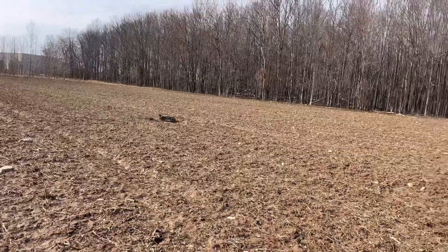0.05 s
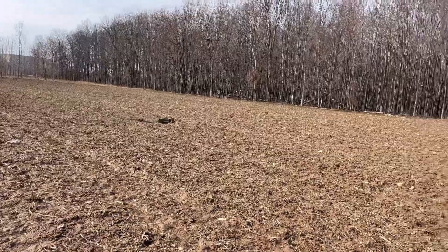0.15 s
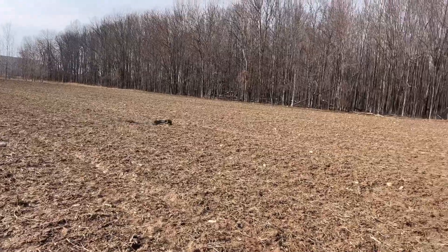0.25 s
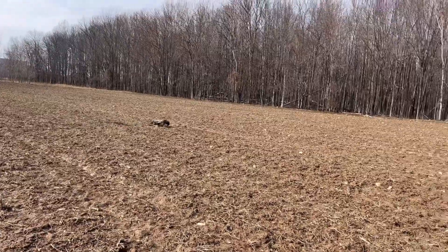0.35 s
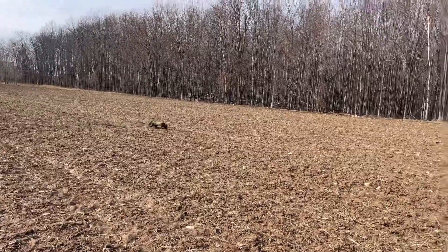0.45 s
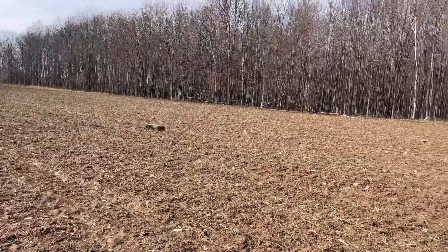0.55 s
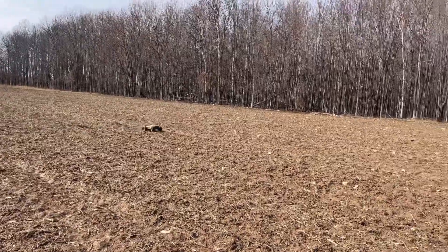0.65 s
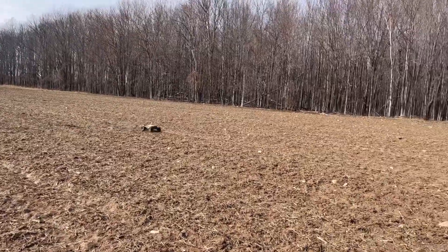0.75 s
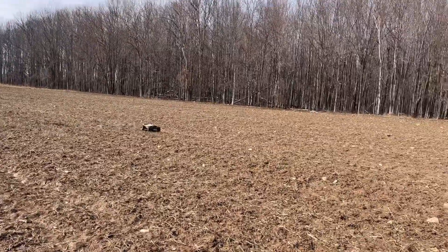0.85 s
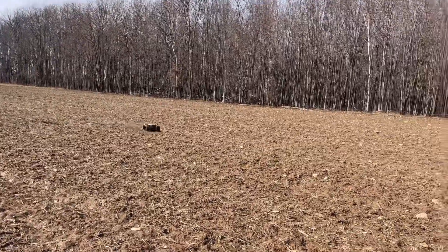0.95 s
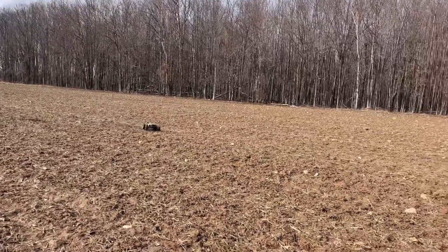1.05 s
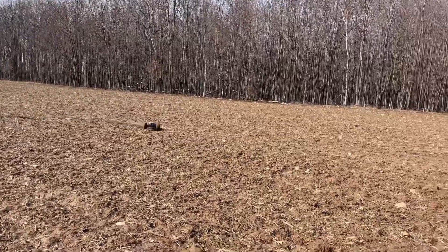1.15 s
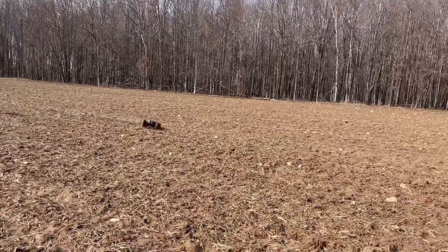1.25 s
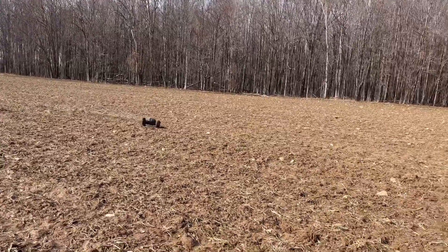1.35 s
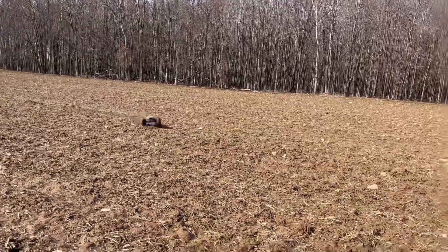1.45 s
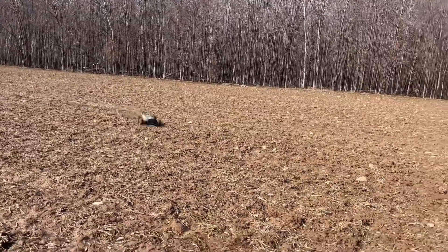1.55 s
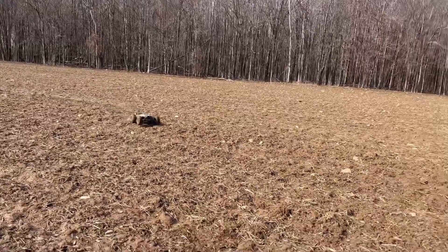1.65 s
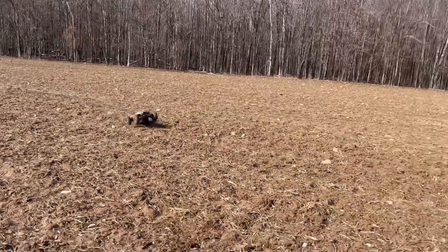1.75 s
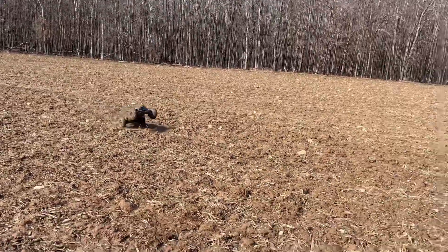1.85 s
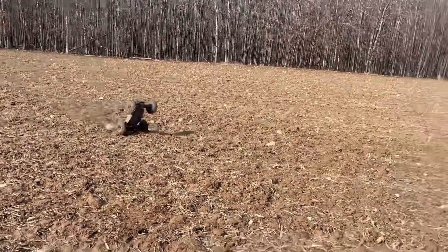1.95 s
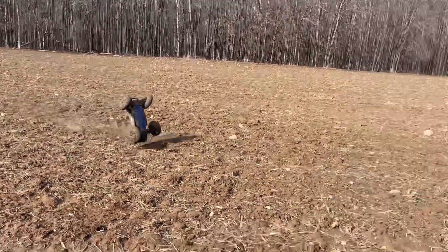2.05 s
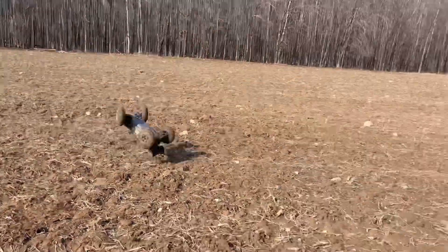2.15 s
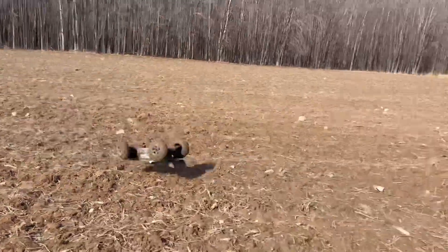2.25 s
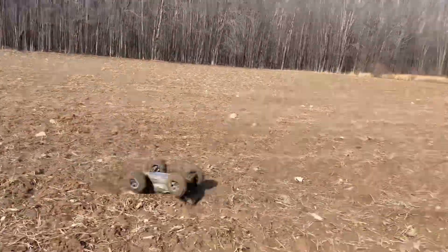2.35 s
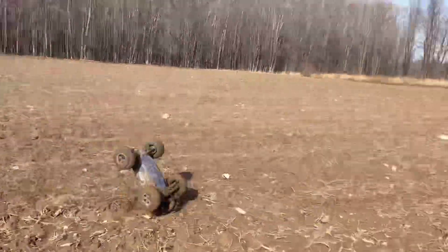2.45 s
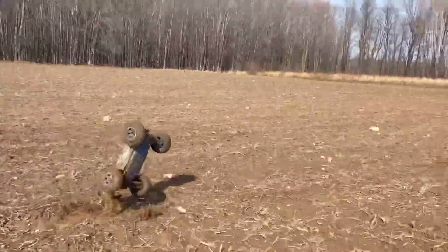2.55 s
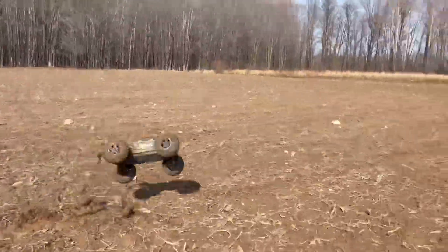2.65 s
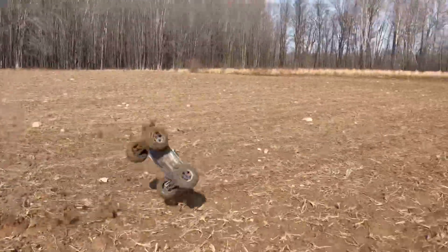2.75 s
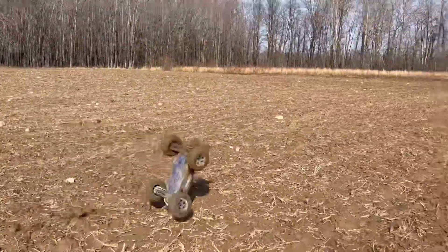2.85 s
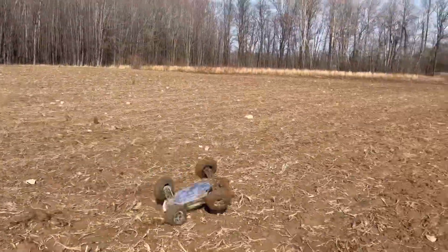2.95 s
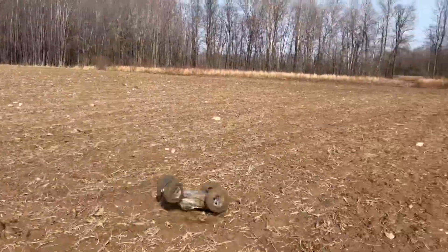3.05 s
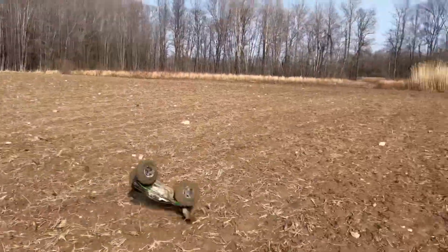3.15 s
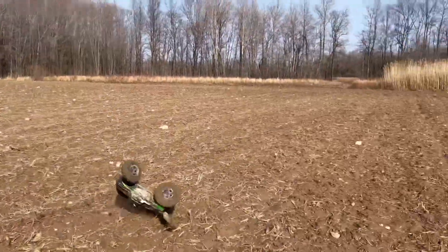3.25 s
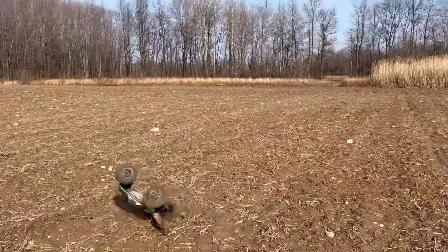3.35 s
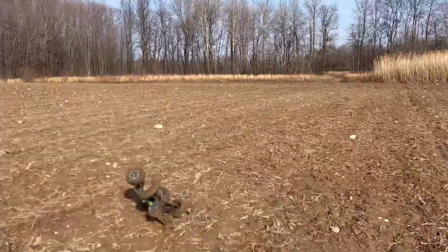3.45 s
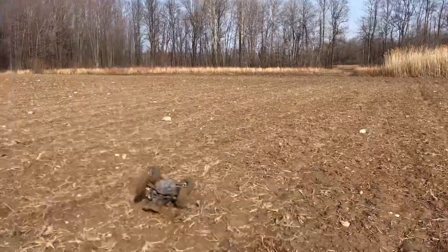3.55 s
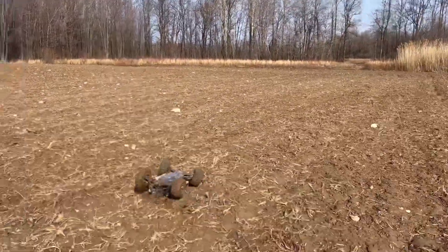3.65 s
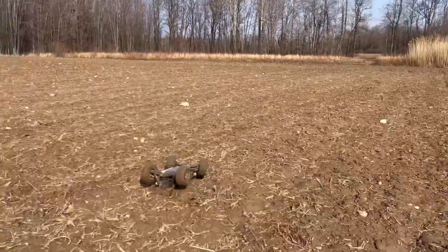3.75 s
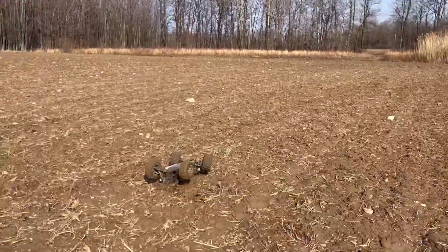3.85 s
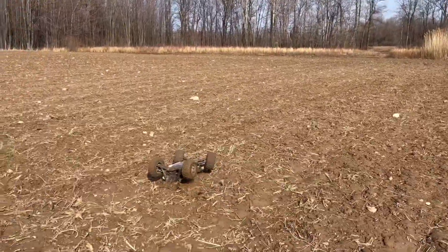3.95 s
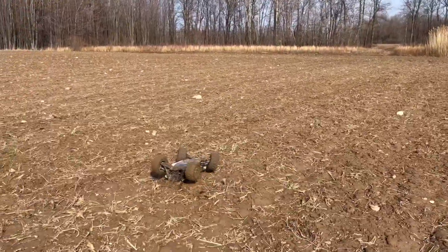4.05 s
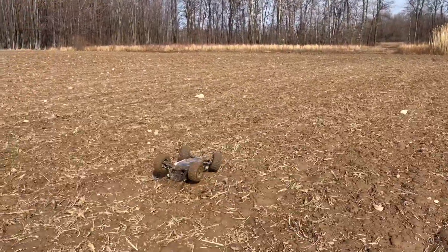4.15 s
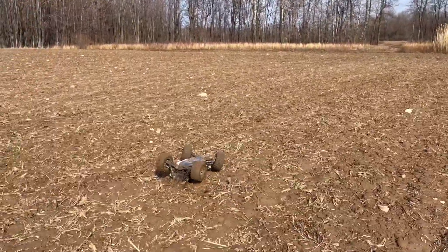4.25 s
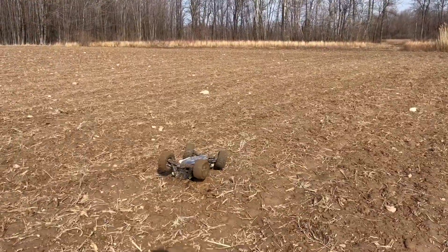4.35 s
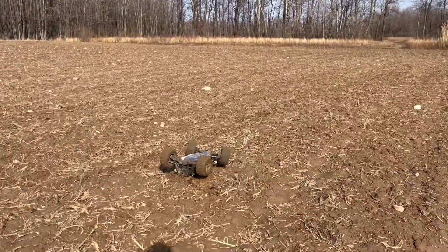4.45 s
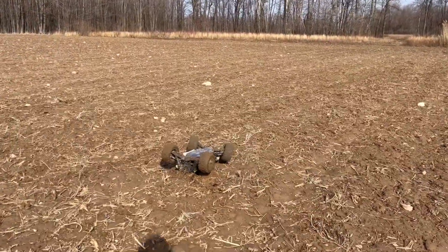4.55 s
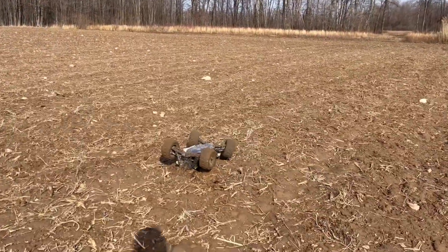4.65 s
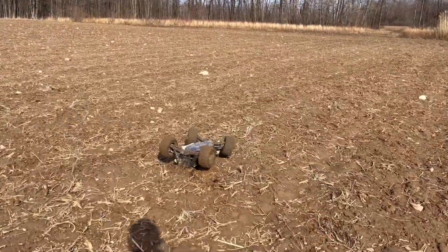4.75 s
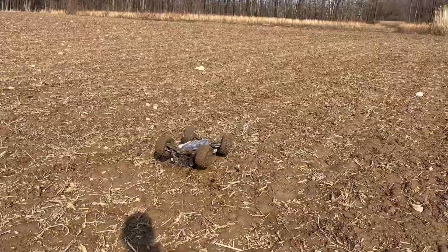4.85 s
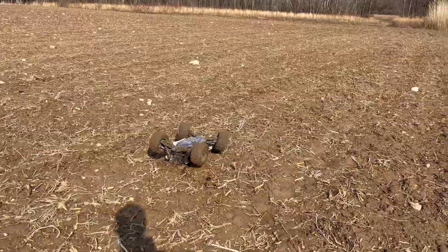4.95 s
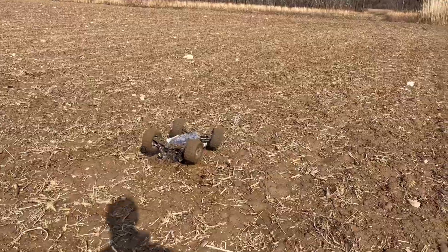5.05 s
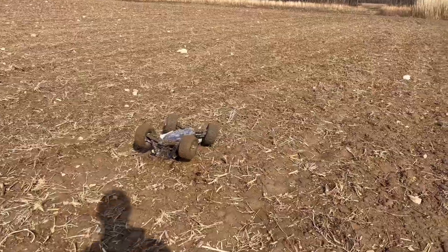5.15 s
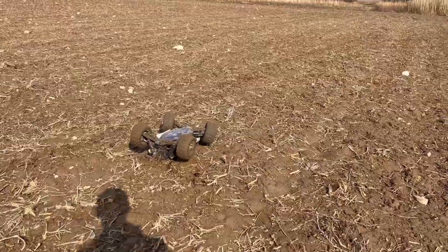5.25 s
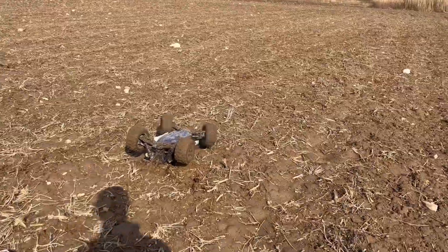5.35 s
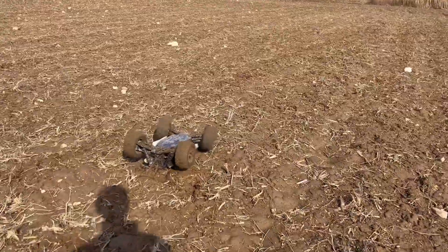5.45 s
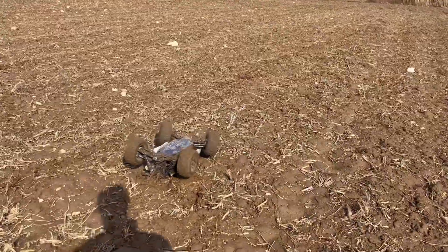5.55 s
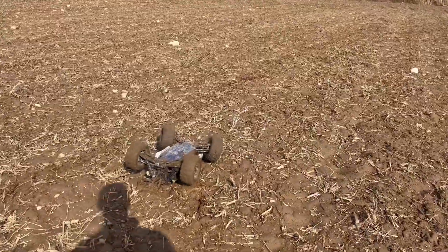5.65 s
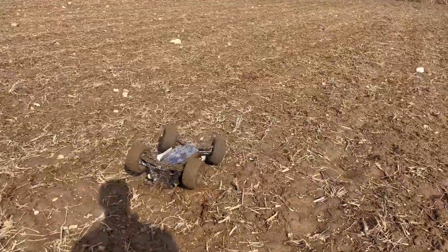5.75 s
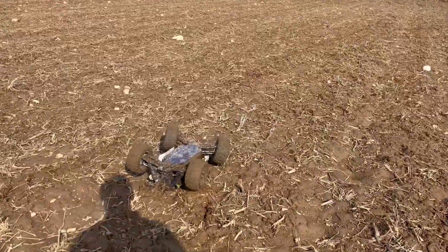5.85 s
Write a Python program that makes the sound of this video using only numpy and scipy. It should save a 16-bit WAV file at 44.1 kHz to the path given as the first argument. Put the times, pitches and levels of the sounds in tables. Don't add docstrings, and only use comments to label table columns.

```python
import sys
import numpy as np
from scipy import signal
from scipy.io import wavfile
from scipy.ndimage import uniform_filter1d

SR = 44100
rng = np.random.default_rng(int(sys.argv[2]) if len(sys.argv) > 2 else 0)


def wav_record(signal):
    frames = np.transpose(np.atleast_2d(signal))
    bounded = np.clip(frames, -1, 1)
    quanta = np.round(bounded * 32767).astype(np.int16)
    wavfile.write(sys.argv[1], SR, quanta)


def attenuation_scalar(level_db):
    decades = np.asarray(level_db, float) / 20
    return 10 ** decades


N = 260190

# t/s, gear mesh f/Hz, whine level/dB
THROTTLE_BURSTS = [
    [(0.0, 2840, -34.5), (0.082, 2540, -61), (0.09, 2530, -62)],
    [(0.245, 1320, -49), (0.275, 1620, -51), (0.3, 1850, -37), (0.344, 2665, -55), (0.38, 2720, -29),
     (0.418, 2380, -62), (0.455, 1810, -40)],
    [(0.585, 1473, -52), (0.62, 1790, -46.5), (0.67, 2040, -43), (0.71, 2150, -58), (0.74, 2500, -48),
     (0.78, 2700, -41), (0.83, 2760, -38), (0.86, 2880, -43), (0.92, 3120, -36), (0.95, 3400, -45),
     (1.03, 3500, -40), (1.08, 3750, -43), (1.16, 3950, -46), (1.19, 4200, -52), (1.215, 4700, -44),
     (1.255, 5200, -47), (1.27, 5850, -38), (1.33, 5780, -39), (1.372, 6220, -32), (1.41, 5800, -35),
     (1.43, 5250, -41), (1.46, 5200, -44)],
    [(1.63, 3830, -56), (1.67, 4200, -42), (1.7, 4900, -44), (1.74, 4950, -41), (1.78, 5950, -37),
     (1.83, 5800, -37), (1.86, 6250, -35), (1.9, 6250, -41), (1.96, 6300, -34), (2.02, 6350, -35),
     (2.045, 6050, -39)],
    [(2.87, 4400, -40), (2.895, 4520, -29), (2.91, 4600, -36), (2.92, 5450, -27), (2.945, 5130, -25),
     (3.0, 5080, -30), (3.025, 5640, -30), (3.07, 5700, -31), (3.088, 6300, -41), (3.105, 7000, -31),
     (3.14, 7300, -36), (3.22, 6830, -55)],
    [(5.33, 740, -45), (5.355, 880, -33), (5.368, 1280, -29), (5.39, 1750, -30), (5.402, 2400, -33),
     (5.42, 2230, -33), (5.43, 2430, -32), (5.44, 2430, -42)],
]
# f/Hz, level/dB
GRIND_COLOUR = [(400, -20.5), (750, 8), (1100, -2), (1320, 4), (1600, 0), (2400, 1), (3300, 0.5),
                (4250, -2.5), (4500, -6), (5500, -6), (6000, -8.5), (7500, -22.5), (10000, -33.5)]
# t/s, share/0-1
PAN = [
    (1.1, .04),
    (1.3, .2),
    (2.1, .3),
    (2.3, .55),
    (3.4, .55),
    (3.75, .95),
    (5.3, .95),
    (5.4, .9),
]


def evened(x):
    return x / np.sqrt(np.mean(x ** 2) + 1e-20)


def read(points, hz):
    f, value = np.transpose(points)
    return np.interp(np.log(hz + 1), np.log(f + 1), value)


def add(mix, s, sound):
    part = mix[:, max(round(s * SR), 0):][:, :sound.shape[1]]
    part += sound[:, :part.shape[1]]


def colour(x, points):
    log_gain = np.log(attenuation_scalar(read(points, abs(np.fft.fftfreq(4096, 1 / SR)))))
    taps = np.fft.ifft(np.exp(np.conj(signal.hilbert(log_gain)))).real[:2048]
    return evened(signal.oaconvolve(x, taps[None], axes=1)[:, :x.shape[1]])


def resonate(x, hz, width_hz, steady=0):
    turn = np.exp(2j * np.pi * np.cumsum(hz) / SR)
    r = np.exp(-np.pi * width_hz / SR)
    slow = signal.lfilter([1], np.convolve([1, -r], [1, -r]), x / turn)
    return evened((turn * slow / (abs(slow) + 1e-9) ** steady).real)


def lumps(per_s):
    size = max(int(SR / per_s), 2)
    return evened(uniform_filter1d(uniform_filter1d(rng.standard_normal(N), size), size))


def grains(per_s, spread_db, wash):
    chance = rng.random(N)
    size = np.minimum(rng.exponential(1, N), 4)
    knocks = uniform_filter1d((chance < per_s / SR) * attenuation_scalar(spread_db * size), 24)
    return (evened(knocks) + wash) * rng.standard_normal((2, N))


def patchy(x, depth_db):
    z = signal.stft(x, nperseg=512)[2]
    field = uniform_filter1d(rng.standard_normal(z.shape[1:]), size=7, axis=0)
    field = uniform_filter1d(field, size=10, axis=1)
    return evened(signal.istft(z * attenuation_scalar(depth_db * evened(field)), nperseg=512)[1][:, :N])


def hiss():
    # f/Hz, level/dB
    hiss_colour = [(4000, -30), (6000, -3), (7500, 0), (9200, 0), (11000, -30)]
    return attenuation_scalar(-68.5) * colour(rng.standard_normal((2, N)), hiss_colour)


def wind():
    # t/s, peak level/dB
    gusts = [(0.06, -35.5), (0.361, -32.5), (0.52, -36), (0.67, -33), (0.919, -32.5), (1.589, -31.5),
             (1.77, -31), (2.02, -31), (2.2, -28), (2.3, -36), (2.6, -51), (3.0, -32), (3.16, -31),
             (3.35, -35), (3.55, -34), (4.4, -46), (4.6, -51), (5.7, -44.5)]
    # f/Hz, level/dB
    gust_colour = [(20, -58), (36, -23), (55, -5), (90, -7), (160, -18), (300, -47)]
    breeze_db, late_db = -44, -48
    rise_db_per_s, fall_db_per_s = 108, 103
    t = np.arange(N) / SR
    level_db = np.interp(t, (3.4, 4.0), (breeze_db, late_db))
    for s, db in gusts:
        away_db = np.maximum(rise_db_per_s * (s - t), fall_db_per_s * (t - s))
        level_db = np.maximum(level_db, db - away_db)
    level_db = level_db + 3.1 * lumps(per_s=17.5) - 2.5
    return attenuation_scalar(level_db) * colour(rng.standard_normal((2, N)), gust_colour)


def stray_ticks(count=24):
    settle = (3.5, 5.3, -30)
    start, end, db = settle
    when, size, pitch = rng.random((count, 3)).T
    peak_db = db - 16 * when + 8 * (size - .5)
    return np.transpose([start + (end - start) * when, peak_db, 8800 + 5600 * pitch])


def tick(s, db, hz):
    t = np.arange(900) / SR
    noise = rng.standard_normal((2, 2, len(t)))
    ping = resonate(noise[0], hz + 0 * t, 1100)
    crack = attenuation_scalar(-13) * colour(noise[1], GRIND_COLOUR)
    return s - .003, attenuation_scalar(db - 8) * (ping + crack) * np.exp(-((t - .005) / .003) ** 2)


def snap(s, db):
    t = np.arange(800) / SR
    burst = colour(rng.standard_normal((2, len(t))), GRIND_COLOUR)
    return s - .001, attenuation_scalar(db - 12.0 - 60 * t / 0.052) * burst * (1 - np.exp(-t / 0.001))


def crunch(s, db):
    t = np.arange(2000) / SR
    burst = colour(rng.standard_normal((2, len(t))), GRIND_COLOUR)
    return s - .001, attenuation_scalar(db - 17.0 - 60 * t / 0.14) * burst * (1 - np.exp(-t / 0.0012))


def blow(s, db, hz, bright_db):
    t = np.arange(4000) / SR
    ring = np.sin(2 * np.pi * hz * t)
    ring = ring + 0.6 * np.sin(2 * np.pi * 1.8 * hz * t) + 0.42 * np.sin(2 * np.pi * 2.7 * hz * t)
    rattle = colour(rng.standard_normal((2, len(t))), GRIND_COLOUR) * attenuation_scalar(bright_db - 5 - 60 * t / 0.07)
    onset = 1 - np.exp(-t / 0.0021)
    return s - .002, attenuation_scalar(db - 3.5) * onset * (ring * attenuation_scalar(-60 * t / 0.095) + rattle)


def throttle():
    rises = [0.0067, 0.023, 0.027, 0.15, 0.0087, 0.021]
    fall_s = 0.1
    t = np.arange(N) / SR
    gas = 0
    for rows, rise_s in zip(THROTTLE_BURSTS, rises):
        start, end = rows[0][0], rows[-1][0]
        gas = gas + np.clip(np.minimum((t - start) / rise_s, (end - t) / fall_s + .5), 0, 1)
    return gas


def efforts():
    # t/s, grind level/dB, weight on the soil as rumble over grind/dB
    run = [(0.5, -51, -2.5), (1.13, -48, 2.5), (1.31, -39, 3), (1.45, -41.5, -1.5), (1.62, -42, 6.5),
           (1.8, -37.5, 1.5), (2.0, -32, 1), (2.219, -29, -1.5), (2.5, -31, -3.5), (2.85, -33.5, -12.5),
           (3.05, -34, 4), (3.272, -25.5, 1.5), (3.43, -32, -2), (3.72, -38, -5.5), (4.65, -44, -10),
           (5.31, -52.5, 1), (5.37, -40.5, -7), (5.85, -35, -10.5)]
    # start t/s, length/s, grind level/dB, rumble over grind/dB
    skids = [(0.272, 0.031, -42, -7), (1.388, 0.032, -47.5, 19), (1.937, 0.031, -33.5, 12),
             (1.99, 0.045, -26, -17), (2.042, 0.1, -30.5, 6), (2.32, 0.01, -20, 9),
             (2.352, 0.043, -22.5, 2), (2.403, 0.02, -24.5, 9.5), (2.644, 0.066, -41.5, -28),
             (2.89, 0.19, -22, -4), (2.983, 0.074, -21.5, 3.5), (3.095, 0.078, -24.5, -19),
             (3.282, 0.022, -34.5, 9.5), (3.483, 0.081, -32, 0.5), (3.563, 0.046, -32.5, -11),
             (4.034, 0.018, -48, -17), (4.683, 0.097, -43, -6), (4.817, 0.036, -41, -2),
             (5.333, 0.081, -29, -37), (5.476, 0.11, -35, -18)]
    skid_rise_s, skid_fade_db_per_s, skid_grit_db = 0.021, 466, -12
    t = np.arange(N) / SR
    s, near_db, run_weight_db = np.transpose(run)
    gas = throttle()
    weight_db = np.interp(t, s, run_weight_db)
    grind_db = np.interp(t, s, near_db) + 7.5 * gas
    spray_db = -8.5 + 3 * gas + 0.21 * weight_db
    quiet_db = 0.6 * np.minimum(grind_db + 40.5, 0)
    grit_db = grind_db + spray_db + quiet_db
    power = attenuation_scalar(2 * np.array([grind_db + weight_db, grind_db, grit_db]))
    for start, length, db, rumble_db in skids:
        fade_db = skid_fade_db_per_s * np.clip(t - start - length, 0, 1)
        shape = np.clip((t - start) / skid_rise_s + .5, 0, 1) * attenuation_scalar(db - fade_db)
        power = power + (attenuation_scalar(np.array([[rumble_db], [0], [skid_grit_db]])) * shape) ** 2
    return 10 * np.log10(power)


def truck():
    # f/Hz, level/dB
    rumble_colour = [(60, -12.5), (130, -7.5), (250, -4), (360, 4.5), (480, 0.5), (650, -9), (900, -18.5),
                     (1500, -40)]
    # f/Hz, level/dB
    resting_colour = [(60, 11.5), (130, -3), (300, 1), (520, 4.5), (700, -7), (1500, -31)]
    # f/Hz, level/dB
    coasting_colour = [(500, -17), (1350, -3), (1800, -6), (4300, -6.5), (4600, -9.5), (7000, -11.5)]
    # f/Hz, level/dB
    grit_colour = [(4000, -32), (6000, -11), (8500, 4.5), (10500, 0), (12000, -3), (14000, 3), (15600, 2),
                   (15900, -9), (16000, -36)]
    rumble_db, grind_db, grit_db = efforts()
    bumps, jolts, clods = lumps(per_s=52), lumps(per_s=220), lumps(per_s=45)
    still = np.interp(np.arange(N) / SR, (3.6, 3.8), (0, np.pi / 2))
    rolling, resting = np.cos(still), np.sin(still)

    thumps = grains(300, 2.7, 2.1)
    shell = rolling * colour(thumps, rumble_colour) + resting * colour(thumps[::-1], resting_colour)
    rumble = attenuation_scalar(rumble_db + 1.3 * clods + 1.1 * jolts + 1.0) * shell

    gears = colour(grains(900, 0.85, 3.7), GRIND_COLOUR)
    gears = rolling * gears + resting * colour(gears[::-1], coasting_colour)
    grind = attenuation_scalar(grind_db + 0.7 * bumps + 1.16 * jolts + 0.8) * patchy(gears, depth_db=2.5)

    shake_db = 1.3 * bumps + 1.2 * lumps(per_s=25) + 1.5 * jolts
    grit = attenuation_scalar(grit_db + shake_db + 5) * colour(grains(450, 3.0, 3.0), grit_colour)
    return rumble + grind + grit


def shaft(rows):
    s, *columns = np.transpose(rows)
    t = np.arange(s[0], s[-1], 1 / SR)
    hz, db = (np.interp(t, s, c) for c in columns)
    hum = resonate(rng.standard_normal((2, len(t))), hz, hz.mean() ** 3 / 4.5e6, steady=.7)
    return s[0], attenuation_scalar(db - 1) * hum * signal.windows.tukey(len(t), .1)


def motor(rows):
    pinion_teeth, steady = 12, .7
    case_step_hz, lock, lock_top_hz = 364, 0.9, 4400
    s, *columns = np.transpose(rows)
    t = np.arange(s[0], s[-1], 1 / SR)
    hz, whine_db = (np.interp(t, s, c) for c in columns)
    over_db = -18 + 13 * abs(np.log2(hz / 2700))
    hz = hz * (1 + hz / 6000 * .011 * lumps(per_s=50)[:len(t)])

    cling = lock * np.clip((lock_top_hz - hz) / case_step_hz, 0, 1)
    held = hz + cling * case_step_hz / (2 * np.pi) * np.sin(2 * np.pi * hz / case_step_hz)
    case = np.r_[1, np.zeros(round(SR / case_step_hz) - 1), 0.6]
    noise = rng.standard_normal((3, 2, len(t)))
    rings = signal.lfilter([1], case, resonate(noise[0, ::-1], hz, .16 * hz.mean()))

    wobble = 1 + 0.6 * np.cos(2 * np.pi * np.cumsum(hz / pinion_teeth) / SR)
    whistle = 1.15 * resonate(noise[0], held, .03 * hz.mean(), steady)
    mesh = (whistle + .8 * (hz / 5000) * evened(rings)) * wobble

    second = attenuation_scalar(-5) * resonate(noise[1], 2 * hz, .12 * hz.mean(), steady)
    third = attenuation_scalar(2) * resonate(noise[2], np.minimum(3 * hz, 2e4), .15 * hz.mean(), steady)

    patches_db = -2 + 4 * lumps(per_s=60)[:len(t)]
    octave = resonate(noise[2], 2 * hz, 0.2 * hz.mean())
    high = attenuation_scalar(patches_db) * signal.lfilter(*signal.butter(4, 9500, 'high', fs=SR), octave)

    over = .8 * signal.lfilter([1], case, second + third)
    over = signal.sosfilt(signal.butter(8, 4000, fs=SR, output='sos'), over)
    broken_db = whine_db - 1 + (1.2 + hz / 4000) * lumps(per_s=55)[:len(t)]
    whine = mesh + attenuation_scalar(np.minimum(over_db, 3) + 7.0) * over + high
    return s[0], attenuation_scalar(broken_db) * whine * signal.windows.tukey(len(t), .06)


def scene():
    # t/s, turns a second f/Hz, hum level/dB
    shaft_runs = [
        [(1.75, 480, -41), (1.9, 520, -32.5), (2.0, 560, -36), (2.15, 486, -43), (2.3, 520, -25.5)],
        [(2.45, 390, -33), (2.58, 570, -60), (2.68, 580, -33.5), (2.75, 560, -41), (2.82, 470, -45)],
        [(2.9, 470, -25.5), (3.0, 520, -28.5), (3.15, 564, -25.5), (3.24, 554, -32), (3.28, 460, -18.5),
         (3.31, 334, -14), (3.35, 204, -35.5), (3.4, 150, -34)],
        [(5.42, 460, -37), (5.5, 350, -45), (5.6, 376, -41), (5.7, 334, -48), (5.8, 360, -48)],
    ]
    # t/s, peak level/dB, ring f/Hz, rattle brightness/dB; the rows near 1.3 kHz
    blows = [(0.897, -28, 417, -17), (1.077, -24, 381, -12), (1.131, -24.5, 250, -3),
             (1.166, -21, 440, -24), (1.193, -26, 416, -15), (1.242, -26, 335, -2), (1.289, -15, 409, -18),
             (1.391, -19.5, 308, -9), (1.722, -18.5, 389, -16), (1.848, -18, 449, 1), (2.137, -35, 500, 22),
             (2.284, -26, 480, -14), (2.324, -0.5, 447.6, -36), (2.515, -22.5, 1352, -11),
             (2.546, -22, 1267, -16), (2.696, -38, 1400, -11), (2.865, -27.5, 1244, 0),
             (2.921, -11, 491.5, -6), (3.158, -31, 547, -17), (3.241, -12, 480, -15),
             (3.438, -31, 522, -13), (5.349, -37, 940, 19)]
    # t/s, peak level/dB, f/Hz
    ticks = [(0.0777, -31.5, 11300), (0.277, -32, 12900), (0.4334, -30.5, 11500), (0.922, -32.5, 11900),
             (1.0692, -29, 10900), (1.6407, -27.5, 11400), (1.7157, -19.5, 10400), (2.222, -24, 11500),
             (2.253, -18, 10400), (2.291, -18, 11900), (2.53, -25, 14500), (2.5745, -21, 14400),
             (2.596, -19, 14500), (2.63, -21, 9550), (2.665, -15, 14000), (2.6893, -23, 10300),
             (2.745, -19, 14500), (2.769, -16, 9000), (2.8, -15, 14500), (2.809, -18.5, 10800),
             (2.831, -12, 14800), (2.8684, -18, 10400), (3.205, -9, 14600), (3.3954, -22, 11300),
             (3.4415, -9, 15300), (3.469, -28, 10900), (3.5718, -24.5, 11600), (3.671, -21.5, 11000),
             (3.807, -27, 10600), (3.9679, -21, 14600), (4.019, -18.5, 11840), (4.204, -21, 14500),
             (4.2557, -27.5, 13400), (4.772, -28, 11300), (5.208, -38, 11800), (5.577, -19, 10100),
             (5.6385, -15, 9330)]
    # t/s, peak level/dB
    crunches = [(3.291, -16), (3.368, -5), (3.534, -26), (3.566, -25), (3.636, -12), (3.767, -18.5),
                (3.861, -38), (4.019, -21), (4.14, -17.5), (4.29, -37), (4.47, -21), (4.511, -22.5),
                (4.551, -20), (4.673, -17.5), (4.723, -22.5), (4.758, -16), (4.816, -25), (4.858, -28),
                (5.08, -28.5), (5.104, -24.5), (5.207, -37), (5.251, -26), (5.638, -11), (5.693, -17),
                (5.744, -13), (5.842, -35)]
    # t/s, peak level/dB
    crackle = [(3.7713, -28), (3.8207, -28), (3.8651, -31), (3.906, -32), (3.9923, -33), (4.0756, -27),
               (4.1818, -20), (4.2921, -35), (4.5111, -32), (4.5675, -29), (4.6029, -37), (4.6722, -38),
               (4.7171, -32), (4.7595, -31), (4.8159, -34), (4.8239, -25), (4.9137, -27), (5.0095, -26),
               (5.0808, -30), (5.2075, -30), (5.228, -44), (5.2524, -43), (5.2898, -31), (2.3245, -2),
               (2.866, -2)]
    field = truck()
    for rows in THROTTLE_BURSTS:
        add(field, *motor(rows))
    for rows in shaft_runs:
        add(field, *shaft(rows))
    strikes = ((blow, blows), (tick, ticks), (tick, stray_ticks()), (crunch, crunches), (snap, crackle))
    for source, events in strikes:
        for row in events:
            add(field, *source(*row))
    return field + wind()


def housing(x):
    echo_ms, echo_db, echo_turned_db = 2.75, -7.5, -4.5
    dull = signal.lfilter(*signal.butter(1, 6000, fs=SR), x)
    late = np.roll(dull, round(echo_ms * SR / 1000) - 1, axis=1)
    turn = np.interp(np.arange(N) / SR, *np.transpose(PAN))
    combed = x - attenuation_scalar(echo_db + turn * (echo_turned_db - echo_db)) * late
    return signal.oaconvolve(combed, signal.firwin(255, 16050, fs=SR)[None], "same")


def ports(x):
    # f/Hz, phase/rad
    lead_before = [(0, 0), (1000, .5), (2200, 1.4), (3300, 3.0), (3900, 3.2), (4500, 3.9), (5000, 3.3),
                   (5300, 3.9), (6000, 3.3), (7000, 3.14), (9100, 3.14), (10000, 1.7), (11000, .1),
                   (12800, -.1), (14000, -1.9), (14700, -3.14)]
    # f/Hz, phase/rad
    lead_after = [(0, 0), (1000, .3), (2200, .7), (3500, 2.0), (5000, 1.4), (6200, 0), (7200, .3),
                  (7900, 3.14), (8500, 3.14), (9600, 1.4), (11000, .1), (12600, -.05), (14000, -1.9),
                  (15000, -3.14)]
    # f/Hz, exponent/1
    lateness = [(6800, 1), (7500, 2.5), (9000, 2.5), (10000, 1)]
    # f/Hz, share/0-1
    likeness = [(50, .84), (300, .995), (700, .93), (1000, .86), (2500, .82), (3600, .76), (5000, .74),
                (5800, .77), (6400, .85), (7300, .95), (8300, .96), (9200, .88), (10000, .85), (11000, .96),
                (12800, .96), (13800, .8), (14800, .96)]
    # f/Hz, share/0-1
    blur = [(2000, 0), (4000, .15), (5600, .2), (6500, .02), (7300, .2), (8200, .2), (9500, .2), (10800, 0)]
    # f/Hz, level/dB
    tilt = [(300, -.7), (1500, 1), (3000, 1), (3800, 2), (4800, 4), (6300, 0), (9200, 0), (9800, -2.5),
            (11000, 0)]
    hz, t, (a, b) = signal.stft(x, SR, nperseg=512)
    turn = np.clip(np.interp(t, *np.transpose(PAN)), 0, 1)
    turn = turn ** read(lateness, hz)[:, None]
    lead = read(lead_before, hz)[:, None] * (1 - turn) + read(lead_after, hz)[:, None] * turn
    like = read(likeness, hz)[:, None] - read(blur, hz)[:, None] * turn
    common = np.sqrt((1 + like) / 2) * a
    apart = np.sqrt((1 - like) / 2) * b
    port = np.exp(.5j * lead) * attenuation_scalar(read(tilt, hz) / 2)[:, None]
    pair = np.array([(common + apart) * port, (common - apart) / port])
    return signal.istft(pair, SR, nperseg=512)[1][:, :N]


def thin_stereo(x):
    under_limit_db, from_hz, ragged_db, jump_db, band = 9, 3300, 2.2, 8.5, 9
    window = ("kaiser", 12)
    sums = np.array([x[0] + x[1], x[0] - x[1]]) / 2
    hz, t, z = signal.stft(sums, SR, window, nperseg=1024, noverlap=768)
    edges = np.arange(0, len(hz), band)
    power = uniform_filter1d(np.add.reduceat(abs(z) ** 2, edges, axis=1), size=7, axis=2)
    under_db = 10 * np.log10(power[::-1] / power)
    waver = evened(uniform_filter1d(rng.standard_normal(under_db.shape), size=12, axis=2))
    keep = (under_db < under_limit_db + ragged_db * waver) | (hz[edges, None] < from_hz)
    treble_db = 10 * np.log10((abs(z[:, hz > 8000]) ** 2).sum(axis=(0, 1)) + 1e-5)
    jumps = treble_db - np.roll(treble_db, 3) > jump_db
    keep = keep | (uniform_filter1d(jumps * 1., size=3) > 0)
    z = z * np.repeat(keep, band, axis=1)[:, :len(hz)]
    mid, side = signal.istft(z, SR, window, nperseg=1024, noverlap=768)[1][:, :N]
    return np.array([mid + side, mid - side])


def top_cut(x):
    return signal.sosfilt(signal.butter(12, 15950, fs=SR, output="sos"), x)


def record(dry):
    heard = ports(housing(dry)) + hiss()
    overloaded = 1.418 * np.tanh(heard / 1.59)
    mix = thin_stereo(overloaded)
    return top_cut(mix)


dry = scene()
out = record(dry)
wav_record(out)
```